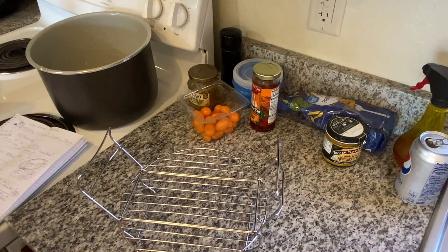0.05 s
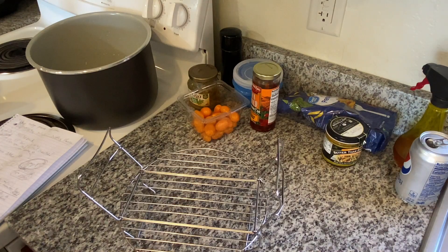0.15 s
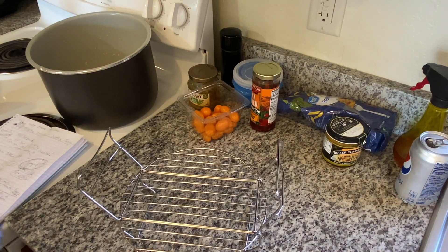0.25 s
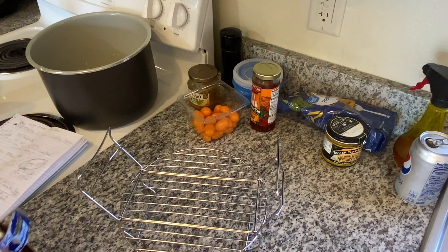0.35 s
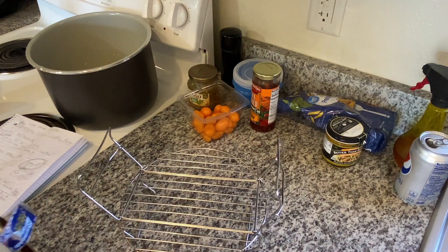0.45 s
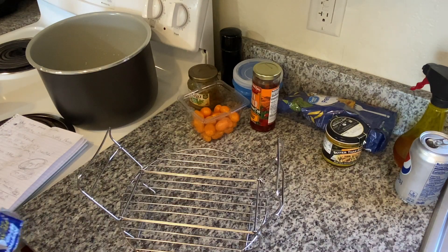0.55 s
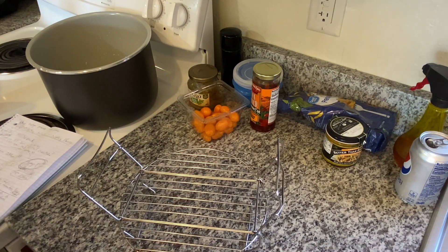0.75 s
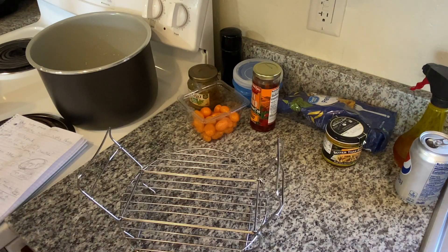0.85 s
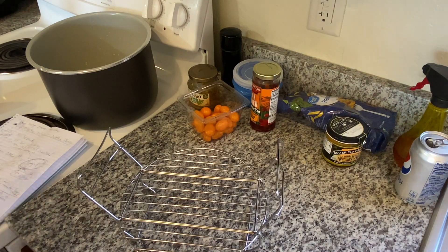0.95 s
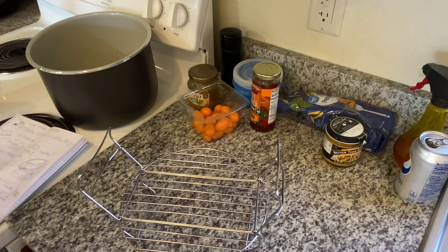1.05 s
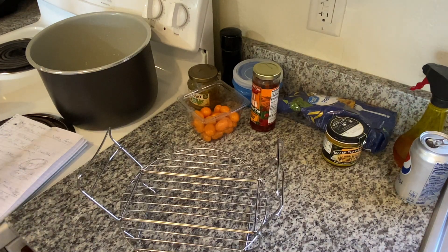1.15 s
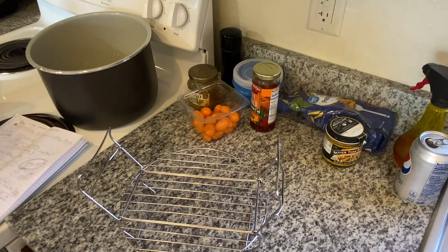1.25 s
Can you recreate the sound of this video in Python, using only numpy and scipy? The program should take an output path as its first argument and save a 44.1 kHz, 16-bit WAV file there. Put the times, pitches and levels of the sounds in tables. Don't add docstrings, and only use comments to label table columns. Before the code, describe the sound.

Aluminum foil is pulled from its boxed roll with bright crinkling, snapping folds and light cardboard knocks, then tears in one loud, quick rip and settles faintly in a hard-walled kitchen, heard through a small microphone.

```python
import sys
import numpy as np
from scipy import signal
from scipy.fft import rfft, irfft
from scipy.io import wavfile
from scipy.ndimage import uniform_filter1d

SR = 44100
rng = np.random.default_rng(int(sys.argv[2]) if len(sys.argv) > 2 else 0)


def convert_level_to_amplitude(level_db):
    exponent = np.asarray(level_db, float) / 20
    return 10 ** exponent


def unload_wav(signal):
    wavfile.write(
        sys.argv[1],
        SR,
        np.round(np.clip(np.atleast_2d(signal).T, -1, 1) * 32767).astype(np.int16),
    )


N = 57330

# pitch in Hz, level in dB per Hz.
HOUSE_HUM = [(24, -64), (40, -17.5), (245, -5), (771, -13), (890, -7.5), (1030, -13.5), (1130, -16.5),
             (4960, -22), (12000, -57.5), (15600, -89), (22000, -120)]
# pitch in Hz, width in Hz, level in dB.
FOIL_RESONANCES = [(330, 400, -11), (800, 250, -9), (1400, 580, -16.5), (1825, 944, -3), (2710, 950, -7),
                   (3567, 710, -1), (4815, 950, -1), (6170, 1100, -3), (7760, 1400, -8),
                   (9520, 1500, -14.5), (10530, 400, -24)]
# start in seconds, level in dB, brightness in dB per octave.
PULL = [(0, -38.5, -1), (.015, -46.5, 2.5), (.018, -35, 0.5), (.19, -39, 2), (.2, -34, 1), (.3, -39.5, 0.5),
        (.325, -42.5, -6), (.36, -37.5, -2), (.4, -40, -2), (.427, -31.5, -1), (.431, -31, 4.5),
        (.456, -27, -0.5), (.48, -26.5, 1.5), (.52, -34, 1), (.565, -30.5, 4), (.585, -30.5, -0.5),
        (.6, -35.5, 0), (.6165, -31, 4)]
# pitch in Hz, time to fade by 60 dB in seconds.
ROOM_FADE = [(150, 0.22), (800, 0.54), (2500, 0.35), (6000, 0.45), (11000, 0.12)]
# start in seconds, peak in dB, pitch in Hz, ring in seconds.
FOLD_SNAPS = [(0.0163, -25, 1700, 0.018), (.0245, -36, 6300, .02), (.0438, -21, 1410, 0.023),
              (.0442, -24, 4500, 0.012), (.103, -25, 7300, 0.025), (.628, -19, 940, .02),
              (.6162, -21, 3200, .04), (.1979, -25, 1800, 0.055), (.236, -24, 1800, 0.01),
              (0.3, -26.5, 1800, 0.079), (0.31, -36, 3400, 0.09), (0.41, -23.5, 3400, 0.12),
              (0.4369, -18.5, 3600, 0.06), (0.63, -24, 1450, .02), (0.44, -23.5, 3400, .03),
              (.466, -25, 3600, .03), (.4614, -11, 1900, 0.023), (.479, -29.5, 6500, 0.031),
              (.494, -32.5, 3500, 0.016), (0.524, -27, 3400, 0.048), (0.6267, -5.5, 1700, 0.024),
              (.9198, -52, 3770, .04), (0.96, -46.5, 3840, 0.14), (1.003, -51.5, 1950, .03),
              (0.58, -45.5, 2700, .1), (.872, -47.5, 5000, 0.09), (1.05, -51.5, 3770, .04),
              (1.272, -59, 3920, .2), (1.4, -72, 6300, 0.072), (.662, -28, 2990, 0.095)]
# start in seconds, peak in dB, pitch in Hz, ring in seconds.
BOX_KNOCKS = [(0.02, -33, 260, 0.016), (0.023, -45, 120, .04), (.033, -22.5, 716, 0.0067),
              (.044, -27, 667, 0.021), (0.103, -30.5, 392, 0.021), (.102, -36, 750, 0.016),
              (0.175, -40, 108, 0.046), (.182, -33.5, 433, 0.095), (0.199, -29.5, 330, 0.031),
              (.198, -20.5, 800, 0.008), (.234, -34, 800, 0.027), (.288, -35, 728, 0.048),
              (0.288, -37, 254, 0.041), (.324, -32.5, 242, .04), (0.326, -44, 109, 0.1),
              (0.345, -32.5, 278, 0.033), (.4605, -18.5, 800, 0.012), (0.463, -26.5, 237, .03),
              (0.465, -19, 473.4, 0.072), (0.493, -33, 220, 0.064), (0.564, -38, 360, 0.095),
              (0.59, -12.5, 374, 0.022), (0.627, -7.5, 216, 0.02), (.627, -12, 765, 0.023),
              (.641, -13, 470, 0.03), (.685, -24, 454, 0.032), (0.692, -53, 180, 0.1),
              (.716, -18.5, 720, 0.0091), (.804, -35.5, 465, 0.082), (0.9781, -33.5, 343, 0.016)]
# start in seconds, level in dB, brightness in dB per octave.
RIP = [
    (.6156, -43, -9.5),
    (.6164, -17, -2.5),
    (.625, -17, -1.5),
    (.633, -12, -1.5),
    (.645, -18.5, -1),
    (.655, -24, 1),
    (.675, -33, 7.5),
    (.69, -37.5, 8),
]
# start in seconds, pitch in Hz, level in dB.
TEETH_SQUEAL = [
    (.645, 2009, -32.5),
    (.649, 2213, -15.5),
    (.66, 2301, -20.5),
    (.669, 2461, -17.5),
    (.678, 2810, -47),
]
# start in seconds, level in dB, brightness in dB per octave.
SETTLE = [
    (.66, -26, -8),
    (.7, -30.5, 0),
    (.78, -38, 1),
    (.82, -44, -13),
    (.89, -55, -8),
    (1.0, -54, -6),
    (1.1, -63, -6),
    (1.26, -84.5, -1.5),
    (1.3, -68.5, 0.5),
]


def unit(x):
    return x / np.sqrt(np.mean(x ** 2))


def band(x, hz, width_hz):
    b, a = signal.iirpeak(min(hz, 0.45 * SR), hz / width_hz, fs=SR)
    return signal.lfilter(b, a, x)


def curve(table, column):
    table = np.array(table)
    return np.interp(np.arange(N) / SR, table[:, 0], table[:, column])


def during(table):
    t = np.arange(N) / SR
    return convert_level_to_amplitude(curve(table, 1)) * (t >= table[0][0]) * (t <= table[-1][0])


def walk(rate):
    hold = int(SR / rate)
    steps = np.repeat(rng.standard_normal(N // hold + 1), hold)
    return unit(uniform_filter1d(steps, hold)[:N])


def house():
    hz, table = np.fft.rfftfreq(N, 1 / SR) + 1, np.array(HOUSE_HUM)
    level_db = np.interp(np.log(hz), np.log(table[:, 0]), table[:, 1])
    hum = irfft(rfft(rng.standard_normal(N)) * convert_level_to_amplitude(level_db), N)
    return unit(hum) * convert_level_to_amplitude(-65.5 + walk(16))


def creases(per_s, spread_db):
    fade_s = 0.00037
    happens = rng.random(N) < per_s / SR
    size = convert_level_to_amplitude(-spread_db * np.log(rng.random(N) + 1e-9))
    bursts = signal.lfilter([1], [1, -np.exp(-1 / (fade_s * SR))], happens * size)
    return bursts * rng.standard_normal(N)


def moving_foil(motion, flicker_db):
    per_s, spread_db, pivot_hz = 7000, 2, 2440
    shared = unit(creases(per_s / 4, spread_db))
    out = 0
    for hz, width_hz, db in FOIL_RESONANCES:
        drive = unit(creases(per_s, spread_db)) + 0.32 * shared
        ringing = band(band(drive, hz, 1.9 * width_hz), hz, 1.9 * width_hz)
        tilt_db = curve(motion, 2) * max(np.log2(hz / pivot_hz), 0)
        gain = convert_level_to_amplitude(db + tilt_db + flicker_db * walk(40.1)) * np.sqrt(width_hz / 1000)
        out = out + gain * unit(ringing)
    return out * during(motion) * convert_level_to_amplitude(-4)


def pulled_sheet():
    pulled = moving_foil(PULL, flicker_db=1.0)
    return pulled - 0.75 * band(pulled, 4400, 450)


def room(x):
    gap_s = 0.0013
    t, table = np.arange(int(0.8 * SR)) / SR, np.array(ROOM_FADE)
    tail = 0
    for hz in 125 * 2.0 ** np.arange(7):
        fade_s = np.interp(np.log(hz), np.log(table[:, 0]), table[:, 1])
        octave = band(rng.standard_normal(len(t)), hz, hz / np.sqrt(2))
        tail = tail + octave * convert_level_to_amplitude(-60 * t / fade_s)
    tail = tail * (1 - np.exp(-t / gap_s))
    tail = tail / np.sqrt(np.sum(tail ** 2))
    return signal.fftconvolve(x, tail)[:N] * convert_level_to_amplitude(-12.5)


def snaps():
    wide_db, tick_db = -12.5, 2
    out, t = np.zeros(N + SR), np.arange(SR // 5) / SR
    for start_s, db, hz, ring_s in FOLD_SNAPS:
        noise = rng.standard_normal(len(t))
        wide = band(band(noise, 4000, 5000), 4000, 5000)
        burst = unit(band(noise, hz, 0.13 * hz)) + convert_level_to_amplitude(wide_db) * unit(wide)
        tick = -convert_level_to_amplitude(tick_db) * np.sin(2 * np.pi * hz * t) * np.exp(-t * hz)
        start = int(start_s * SR)
        out[start:start + len(t)] += convert_level_to_amplitude(db - 8) * (convert_level_to_amplitude(-60 * t / ring_s) * burst + tick)
    return out[:N]


def knocks():
    push_cycles = 0.28
    out, t = np.zeros(N + SR), np.arange(SR // 5) / SR
    for start_s, db, hz, ring_s in BOX_KNOCKS:
        rise = 1 - np.exp(-(t * hz / push_cycles) ** 2)
        start = int(start_s * SR)
        out[start:start + len(t)] += convert_level_to_amplitude(db - 60 * t / ring_s) * rise * np.sin(2 * np.pi * hz * t)
    return out[:N]


def ripped_sheet():
    return moving_foil(RIP, flicker_db=0.8)


def squeal():
    width_hz = 1500
    low_pass = signal.butter(2, width_hz / 2, fs=SR, output="sos")
    scrape = unit(signal.sosfilt(low_pass, creases(12000, 0.71)))
    tone = np.sin(2 * np.pi * np.cumsum(curve(TEETH_SQUEAL, 1)) / SR)
    levels = [(start_s, db) for start_s, _, db in TEETH_SQUEAL]
    return np.sqrt(2) * scrape * tone * during(levels)


def settling_sheet():
    return moving_foil(SETTLE, flicker_db=2.0)


def scene():
    foil = pulled_sheet() + snaps() + ripped_sheet() + squeal() + settling_sheet()
    box = knocks()
    echoes = room(foil + convert_level_to_amplitude(-3) * box)
    return (house() + foil + box + echoes)[None]


def band_limit(x):
    return signal.sosfilt(signal.butter(12, 12300, fs=SR, output="sos"), x)


def record(dry):
    ceiling, low_hz, top_hz = 0.45, 105, 11650
    rounded = ceiling * np.tanh(dry / ceiling)
    no_bass = signal.sosfilt(signal.butter(2, low_hz, "high", fs=SR, output="sos"), rounded)
    mix = signal.sosfilt(signal.cheby1(8, 1, top_hz, fs=SR, output="sos"), no_bass)
    return band_limit(mix)


dry = scene()
out = record(dry)
unload_wav(out)
```